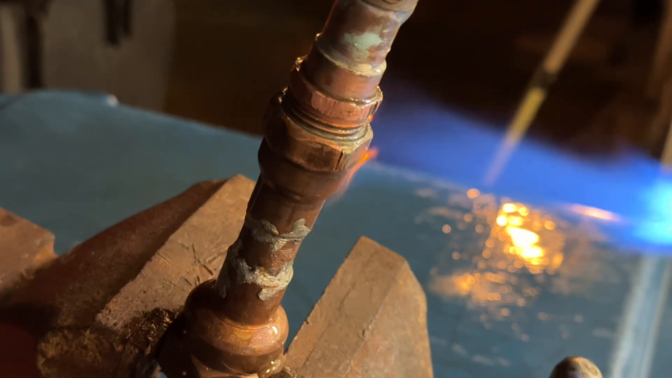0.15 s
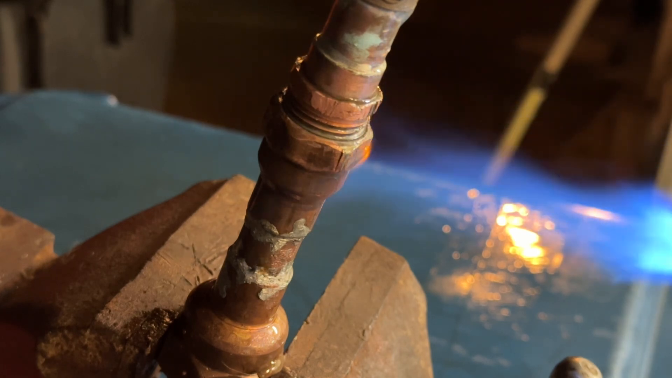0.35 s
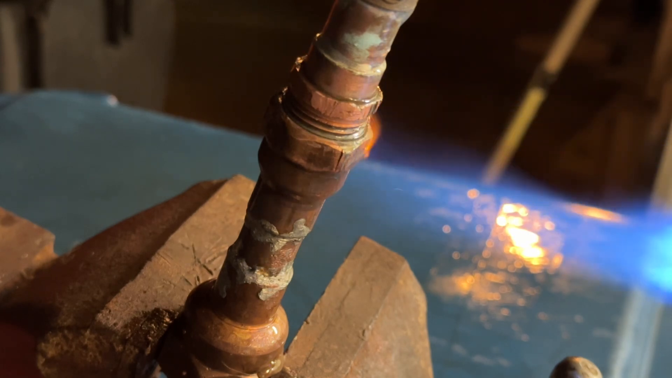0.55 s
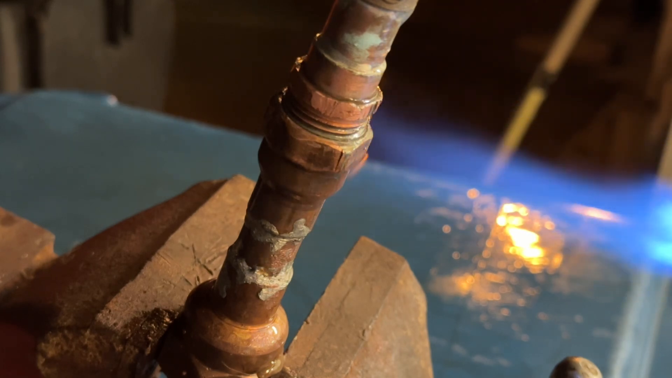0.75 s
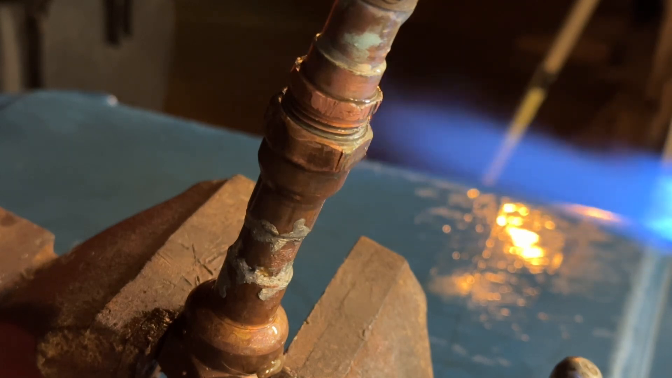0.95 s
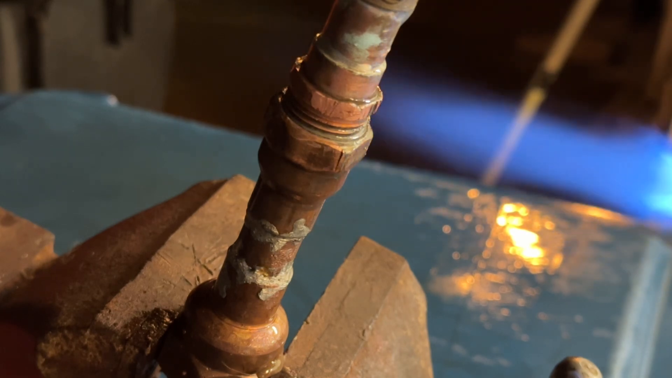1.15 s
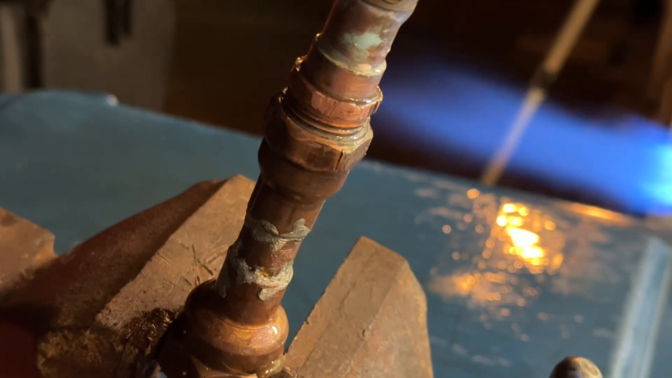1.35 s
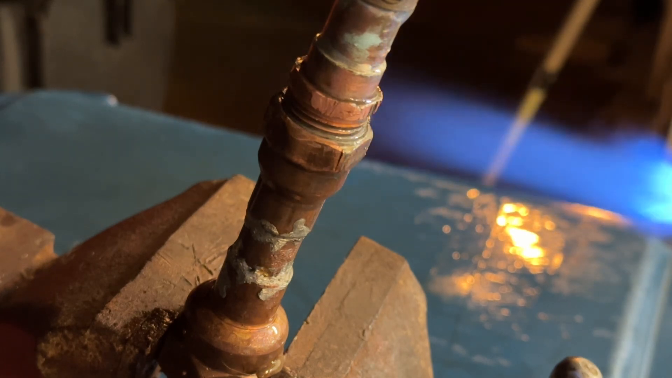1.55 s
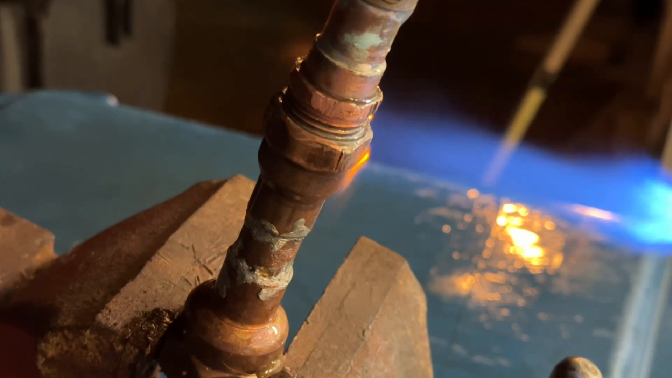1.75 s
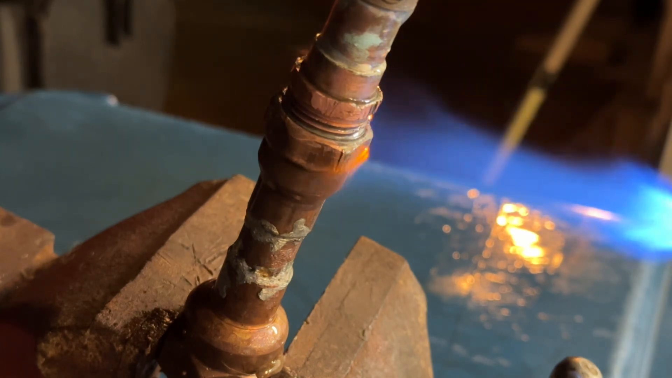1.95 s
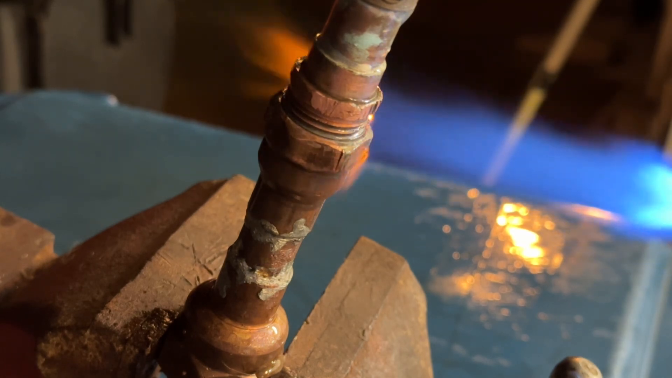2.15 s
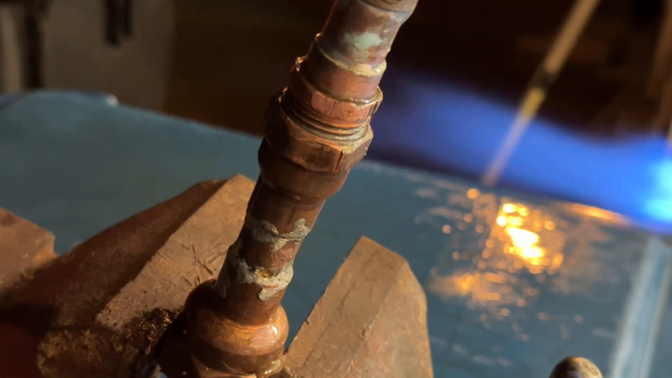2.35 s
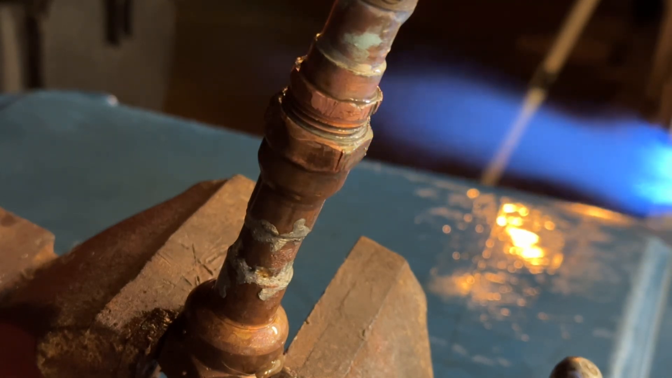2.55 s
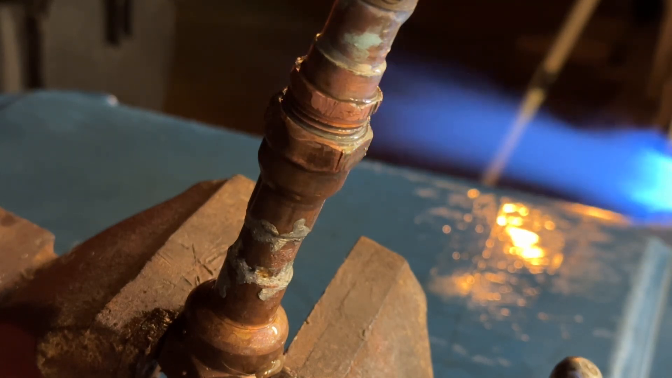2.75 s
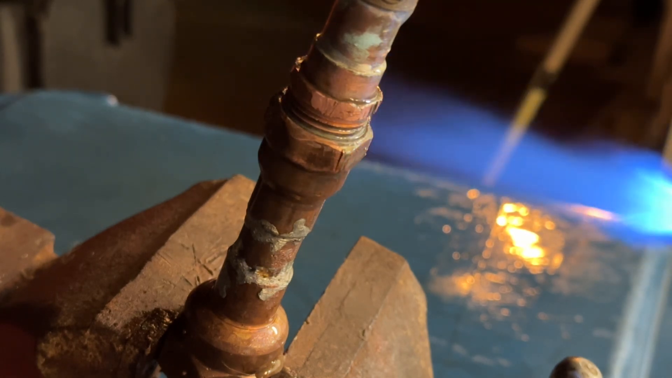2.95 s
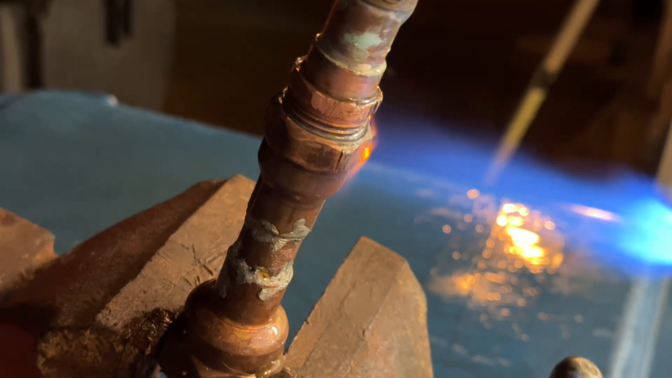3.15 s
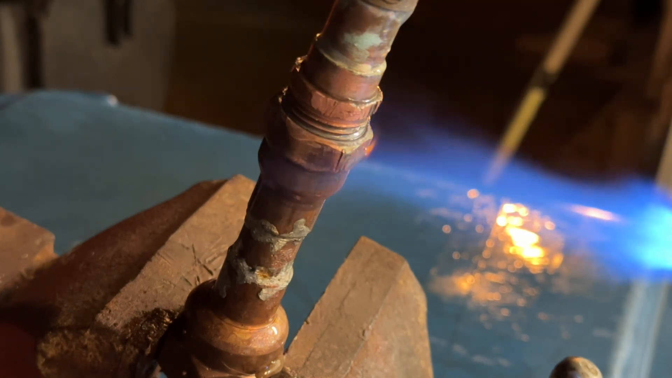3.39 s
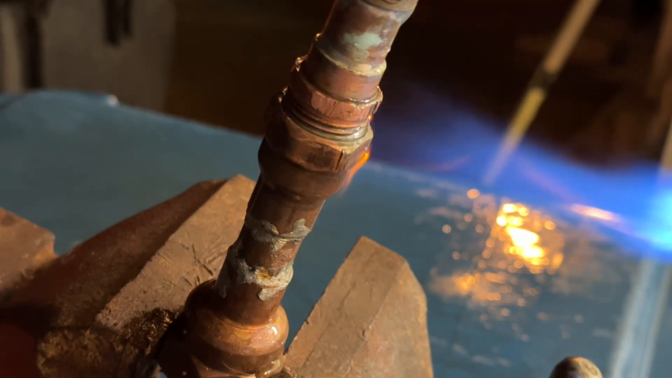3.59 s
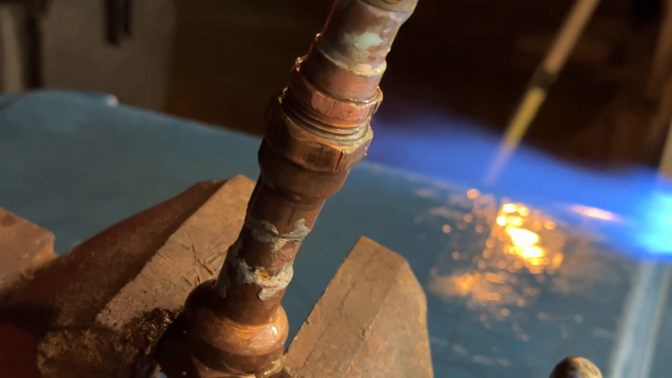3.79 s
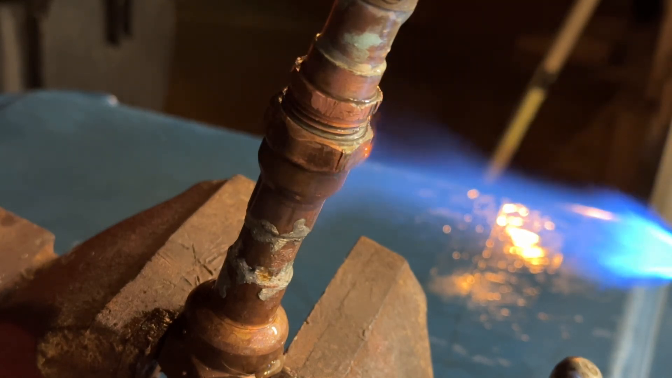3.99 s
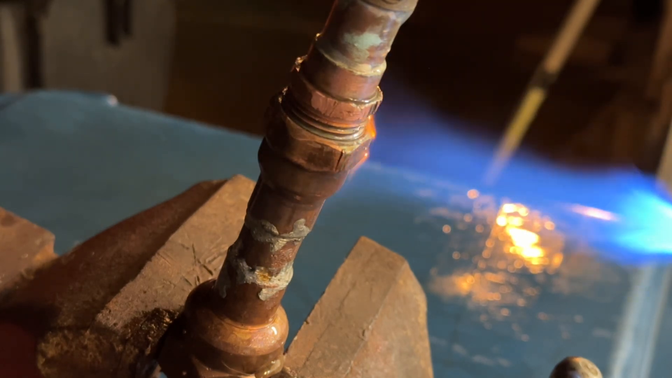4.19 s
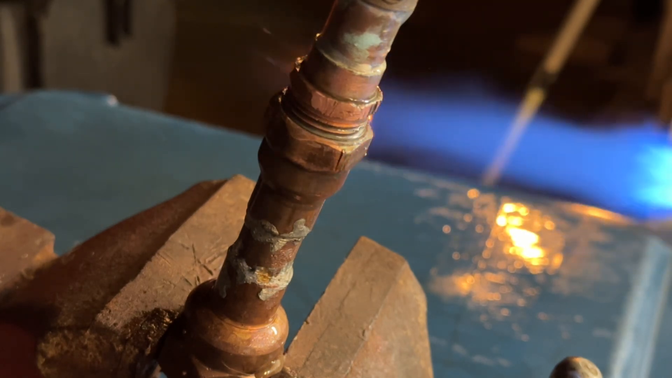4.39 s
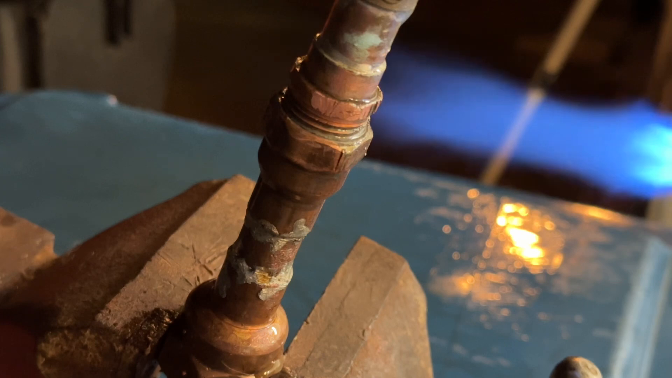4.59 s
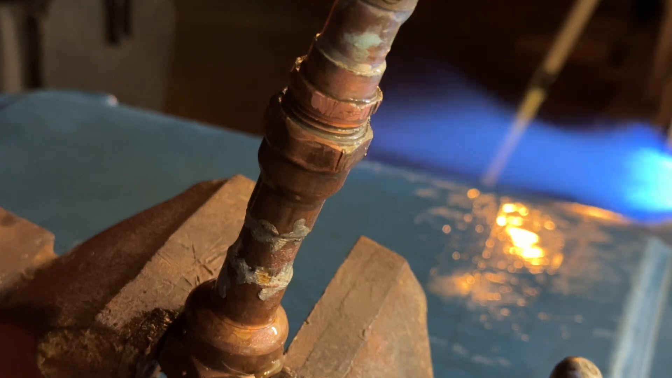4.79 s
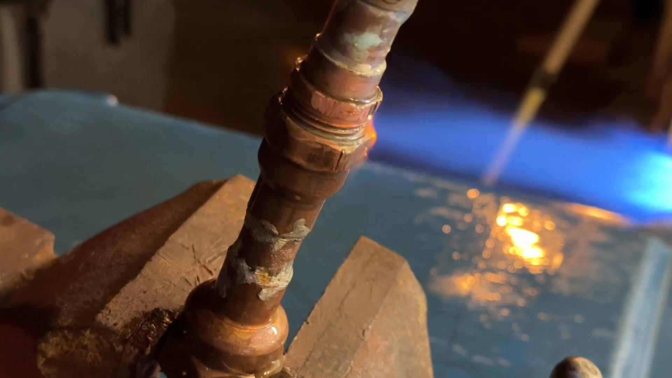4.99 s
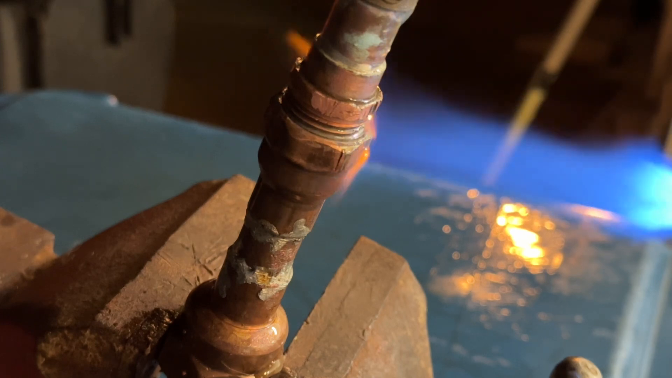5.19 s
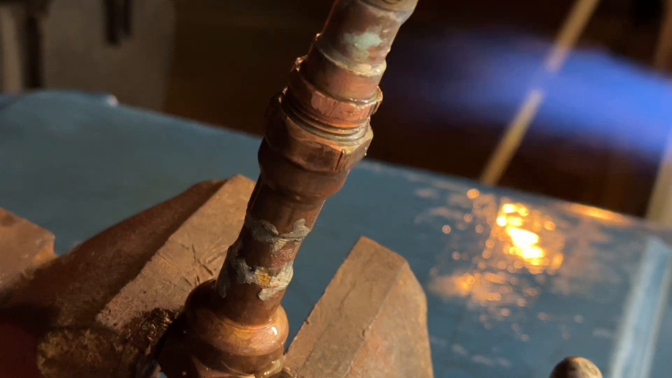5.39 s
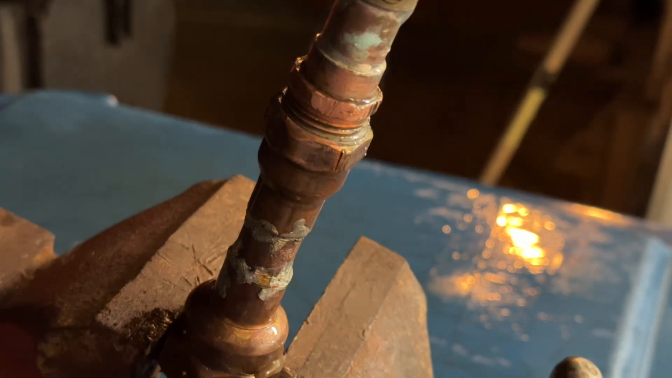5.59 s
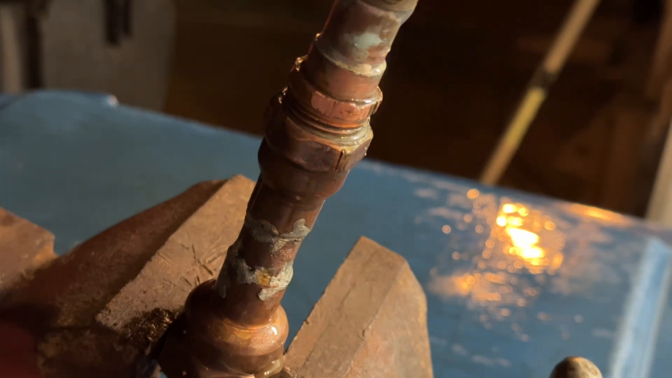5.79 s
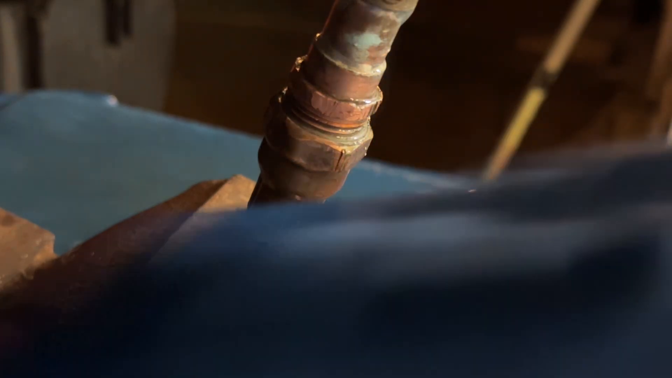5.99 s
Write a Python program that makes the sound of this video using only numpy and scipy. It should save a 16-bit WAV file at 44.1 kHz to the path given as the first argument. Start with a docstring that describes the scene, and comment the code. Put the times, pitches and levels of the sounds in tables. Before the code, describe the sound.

A hand-held gas torch roars and hisses steadily up close, then the valve clicks shut and the flame pops out, leaving quiet room rumble.

```python
"""A broad, wavering roar is heard first: a hand-held gas torch close to a two-port microphone in a small workshop.
The turbulent flame rumbles and the gas jet hisses through the burner tube, both as noise in third-octave bands.
Then the valve clicks shut (noise bursts), the flame shrinks and goes out in low puffs (gliding sines) with a short
whistle (a roughened sine), and the last gas seeps out (narrow noise bands) over the rumble and hiss of the room."""
import sys
import numpy as np
from scipy import signal
from scipy.fft import rfft, irfft, next_fast_len
from scipy.io import wavfile
from scipy.ndimage import uniform_filter1d

SR = 44100
rng = np.random.default_rng(int(sys.argv[2]) if len(sys.argv) > 2 else 0)


def wrap_up_sound(samples):
    """Save the sound to the file named by the first command line argument, as 16-bit audio."""
    columns = np.atleast_2d(samples).T
    # keep every value between -1 and 1, then stretch to whole-number steps
    tamed = np.clip(columns, -1, 1)
    steps = np.round(tamed * 32767).astype(np.int16)
    wavfile.write(sys.argv[1], SR, steps)


N = 266364
T = np.arange(N) / SR
SIZE = next_fast_len(N)
HZ = np.maximum(np.arange(SIZE // 2 + 1) * SR / SIZE, 1)
TOP_HZ = 15780  # upper band limit of the recorder and the ticks


def undb(db):
    """Decibel law: a level becomes an amplitude ratio."""
    return 10 ** (np.asarray(db) / 20)


def level(x, db):
    """Root-mean-square level: the signal is scaled to db relative to 1."""
    return x * undb(db) / np.sqrt(np.mean(x ** 2))


def to_spectrum(x):
    """Fourier analysis over the padded length."""
    return rfft(x, SIZE)


def to_wave(spectrum):
    """Fourier synthesis, cut to the length of the scene."""
    return irfft(spectrum, SIZE)[..., :N]


def across(table):
    """Log-frequency interpolation: columns of a table read at every frequency."""
    hz, *columns = np.transpose(table)
    return [np.interp(np.log(HZ), np.log(hz), column) for column in columns]


def bell(hz, width):
    """Gaussian band weighting, down to one half at half the width from its centre."""
    return np.exp(-np.log(2) * (2 * (HZ - hz) / width) ** 2)


def swell(full_s, rise_s, fade_s):
    """Gaussian envelope in time with its own rise and fade."""
    spread_s = np.where(T < full_s, rise_s, fade_s)
    return np.exp(-.5 * ((T - full_s) / spread_s) ** 2)


def walk(rate):
    """Low-frequency random modulation: levels held 1 / rate s and slewed twice, with unit spread."""
    k = int(SR / rate)
    steps = np.repeat(rng.standard_normal(N // k + 1), k)
    smooth = uniform_filter1d(uniform_filter1d(steps, k), k)[:N]
    return smooth / smooth.std()


# How left and right differ: f/Hz, left lags/rad, unrelated share (0-1), left minus right/dB
PORT_DIFFERENCES = [(100, 0, .0005, -0.9), (180, 0, 0, 0.4), (300, -0.045, 0, 1.2), (590, 0.39, 0.02, 0),
                    (770, -0.0094, 0.02, -1.5), (1140, 0.12, 0.03, -1.5), (1260, 0, 0, -1), (1500, 0, 0, 0),
                    (2650, 0, 0, 0), (2960, 0.0074, 0, -0.5), (3480, -0.0038, 0.02, 0.5),
                    (4370, 0.3, 0, -0.5), (5100, 0, 0, -1.5), (6200, 0, 0, 0.5), (6350, 0, 0, 0),
                    (6830, 0, 0, 0), (6960, -0.87, 0.13, -3), (7480, -1.87, 0, 1.5), (7800, -np.pi, 0, 0),
                    (8550, -np.pi, 0, 0), (9050, -1.99, 0, 0), (10570, 0.22, 0.28, 0), (11050, 0, .002, 0),
                    (13050, 0, .003, 0), (13700, .1, .08, 0), (13850, .9, .4, 0), (15700, 2, .45, 0)]


def ports(x, unrelated=0):
    """Phase and level differences between left and right by frequency, plus an unrelated noise share."""
    rad, share, pan_db = across(PORT_DIFFERENCES)
    share = np.clip(share, 0, 1)
    sides = np.array([[.5], [-.5]])
    common = to_spectrum(x) * undb(sides * pan_db) * np.exp(-1j * sides * rad)
    separate = to_spectrum(unrelated + np.zeros((2, N)))
    return np.sqrt(1 - share) * common + np.sqrt(share) * separate


# Movement of the torch over the bench: t/s, lift (-1 to 1), turn (-1 to 1)
HAND_MOVEMENT = [(0, 0.39, 0.1), (.6, -0.72, 0.67), (1.35, 0.82, -0.1), (2., -.4, 0.32), (2.6, 0.43, -0.21),
                 (3.35, -0.58, 0.27), (4., 0.019, 0.47), (4.6, .2, -0.94), (5.15, -1, -1)]
# Hiss bands that change with it: f/Hz, width/Hz, gain change per lift, gain change per turn
MOVED_BANDS = [(4230, 450, 0.34, -0.35), (5070, 440, -0.39, 0.15), (5800, 400, 0, .3),
               (6220, 350, -0.1, -0.74), (7100, 270, -0.14, -0.29), (9670, 510, 0.11, -.45),
               (10400, 450, -0.15, .1), (10950, 400, 0.069, .3), (11600, 450, 0, -.45),
               (12050, 350, .25, 0), (12450, 300, -.25, -.1), (13100, 600, .2, .4), (14200, 500, 0, .25)]


def moved(x):
    """Interference with bench echoes: lifting and turning the torch strengthens some hiss bands, weakens others."""
    s, *hand = np.transpose(HAND_MOVEMENT)
    hz, width, *changes = np.transpose(MOVED_BANDS)
    bands = np.array([bell(*b) for b in zip(hz, width)])
    spectrum = to_spectrum(x)
    return x + sum(np.interp(T, s, h) * to_wave(spectrum * (c @ bands)) for h, c in zip(hand, changes))


ROAR_TOP_HZ = 900
TREBLE_FALL_PER_OCTAVE = 0.034  # extra share of the flow's fall for each octave above the roar
BASS_FALL_PER_OCTAVE = 0.058  # share of that fall spared for each octave below the roar
JET_FALL, JET_HZ = .5, 7800  # further share for the thin hiss of the jet, mostly above this pitch


def fall_share(centre):
    """Frequency-dependent decay: how strongly a band follows the flow, more in the treble than in the bass."""
    octaves = np.log2(centre / ROAR_TOP_HZ)
    share = 1 + TREBLE_FALL_PER_OCTAVE * max(octaves, 0)
    share += JET_FALL / (1 + (JET_HZ / centre) ** 10)
    return share - BASS_FALL_PER_OCTAVE * max(-octaves, 0)


# Broad colour of the torch: f/Hz, relative spectral level/dB
TORCH_COLOUR = [(25, -62), (40, -32), (60, -13.5), (120, -5), (210, 0), (500, -4), (850, -5), (1200, -8.5),
                (1800, -14.5), (3750, -18), (4200, -25), (7500, -23), (8600, -21.5), (10750, -25),
                (11300, -32), (16000, -35)]
# Burner-tube resonances, and dips where the bench echo cancels: f/Hz, width/Hz, level/dB
TUBE_BANDS = [(480, 27, -3.5), (1523, 196, -7.5), (2270, 210, 2), (2820, 110, -2), (4780, 220, -6),
              (5120, 230, 3.5), (5866, 380, 6), (6850, 270, -5.5), (7390, 630, 4), (7910, 490, -14),
              (9350, 1100, 2.5), (12200, 350, 2.5), (13050, 350, 3), (13600, 400, -2), (14250, 400, 4)]
# Gas flow, wavering and then shut off by the valve: t/s, level/dB of the roar
GAS_FLOW = [(.2, 0.8), (.75, 0.5), (1.25, -0.4), (1.75, 0.5), (2.25, -0.1), (2.8, 0.1), (3.25, .5),
            (4.2, 0.45), (4.8, 0), (5.42, 0.5), (5.46, -1), (5.48, -2), (5.52, -5.5), (5.54, -10.5),
            (5.548, -18), (5.563, -22), (5.57, -26), (5.6, -36), (5.66, -47), (5.75, -72)]
GUST_DB, GUST_HZ, GUST_OCTAVES = 0.67, 232, 1.15  # lumpy gusts shared by the low bands
SPUTTER_DB, RAGGED_DB = 1.5, 2  # while the flame starves: stutter of all bands, extra flicker of each


def torch():
    """Band-filtered turbulence: neighbours waver together, each flickers and drifts; treble dies first."""
    flow_db = np.interp(T, *np.transpose(GAS_FLOW))
    colour_db = across(TORCH_COLOUR)[0] + sum(db * bell(hz, width) for hz, width, db in TUBE_BANDS)
    # uneven eddies: the size of the noise itself varies at two rates
    unevenness_db = 0.5 * walk(300) + 0.15 * walk(70)
    eddies = rng.standard_normal((3, N)) * undb(unevenness_db)
    both = ports(eddies[0], eddies[1:]) * undb(colour_db)
    gust = walk(24.07)
    starving = np.clip((-1 - flow_db) / 7, 0, 1)
    sputter = SPUTTER_DB * starving * walk(70)
    waver, out = walk(12), 0
    for step in range(29):
        centre = 31 * 2 ** (step / 3)
        # overlapping triangles a third of an octave apart
        band = np.clip(1 - 3 * np.abs(np.log2(HZ / centre)), 0, 1)
        waver = 0.88 * waver + 0.6 * walk(12)
        gust_share = np.exp(-(np.log2(centre / GUST_HZ) / GUST_OCTAVES) ** 2)
        db = fall_share(centre) * flow_db + sputter
        db = db + GUST_DB * gust * gust_share + RAGGED_DB * starving * walk(45)
        db = db + 0.37 * waver + 0.6 * walk(30.03) + 0.22 * walk(1.66)
        out = out + undb(db) * to_wave(both * band)
    return level(moved(out), -22.0)


WIDER_FROM_S, WIDENING_TAKES_S = 5.44, 0.036


def widening():
    """Linear crossfade: 0 before 5.44 s, then up to 1 within 36 ms."""
    return np.clip((T - WIDER_FROM_S) / WIDENING_TAKES_S, 0, 1)


# Colour of the room: f/Hz, relative spectral level/dB
ROOM_COLOUR = [(30, -6), (50, -3), (88, -5), (200, -9), (400, -21), (600, -23), (1000, -29), (1700, -31.5),
               (3000, -36), (7000, -38), (10500, -42), (12000, -49), (16000, -53.5)]
# Room sound of opposite sign in left and right: f/Hz, level/dB against air noise of the same colour
ROOM_DIFFERENCE = [(60, -14), (150, -19), (270, -15), (420, -4), (800, -2), (1200, -4), (1650, -5),
                   (2100, -8), (2600, -24), (4000, -40)]
ROOM_DB = -51.5


def room():
    """Partly coherent background noise: low rumble and faint hiss, with an antiphase part from 5.44 s on."""
    colour = undb(across(ROOM_COLOUR)[0]) * np.minimum(HZ / 40, 1) ** 3
    noise = to_wave(to_spectrum(rng.standard_normal((4, N))) * colour)
    air = level(noise * undb(3.3 * walk(12)), ROOM_DB)
    apart = to_spectrum(air[3] * widening()) * undb(across(ROOM_DIFFERENCE)[0])
    return to_wave(ports(air[0], 3.0 * air[1:3]) + apart * np.array([[1], [-1]]))


# Wider low sound: f/Hz, left lags/rad, left minus right/dB
LOW_WIDTH = [(45, .1, 0), (150, .25, 0), (270, .4, 0), (420, .55, 0), (600, .4, -1.5), (800, .7, -1.5),
             (1350, .95, 0), (1650, .4, -1), (2000, .03, -.7), (2400, -.2, 0), (2800, -.25, 0),
             (3500, -.05, 0), (4000, 0, 0)]


def widened(x):
    """Stereo width: from 5.44 s on, the low sound is heard wider, differing in phase and level left to right."""
    rad, pan_db = across(LOW_WIDTH)
    late = x.mean(axis=0) * widening()
    # tanh of half the log ratio gives the side part that yields this left / right ratio
    side_ratio = np.tanh(np.log(undb(pan_db / 2)) - .5j * rad)
    side = to_wave(to_spectrum(late) * side_ratio)
    return x + np.array([side, -side])


# Valve and hand ticks: t/s, peak level/dB, centre f/Hz, width/octaves, t60/s of the added decay
VALVE_TICKS = [(5.476, -26, 8500, 1.7, 0.018), (5.5605, -41, 2600, 2.2, .012),
               (5.562, -46, 7000, 1.2, .014), (5.571, -49, 3800, 1.2, .014), (5.698, -41, 2800, 1.3, .02),
               (5.7012, -42, 6500, 1.8, .012), (5.7017, -36.5, 2100, 1.5, .01), (5.705, -55, 2700, .5, .08),
               (5.706, -52, 6000, .9, .09), (5.72, -52, 4000, .8, .01), (5.721, -55, 6900, .5, .06),
               (5.791, -55, 6900, .4, .02), (5.82, -60, 5900, .15, .04), (5.852, -57, 6800, .5, .014),
               (5.859, -49, 6000, .7, .014), (5.872, -59, 6300, .6, .014), (5.98, -56, 1200, 1.2, .02),
               (6.017, -58, 2500, .25, .03)]


def ticks():
    """Impulsive excitation: short band-passed noise bursts with exponential decay."""
    out, t = np.zeros(N), np.arange(3000) / SR
    noises = rng.standard_normal((len(VALVE_TICKS), len(t)))
    for (s, db, hz, octaves, t60), noise in zip(VALVE_TICKS, noises):
        half_width = 2 ** (octaves / 2)
        edges = [hz / half_width, min(hz * half_width, TOP_HZ)]
        sos = signal.butter(2, edges, "band", fs=SR, output="sos")
        burst = signal.sosfilt(sos, noise) * np.exp(-np.log(1000) * t / t60)
        i = int(s * SR)
        out[i:i + len(t)] += (undb(db) * burst / np.abs(burst).max())[:N - i]
    return out


# Puffs of the flame going out: t/s, level/dB before the envelope, start f/Hz, rise/s, t60/s
FLAME_PUFFS = [(5.6996, -22.5, 696, 0.00085, 0.018), (5.7014, -25, 330, .001, .02),
               (5.704, -18, 140, .005, 0.08), (5.739, -36, 800, .001, .016),
               (5.7413, -11, 235, 0.011, 0.031), (5.7495, -30, 520, .0007, .012),
               (5.7515, -41, 950, .0007, .014), (5.7523, -24.5, 165, .001, .04),
               (5.7605, -31, 75, .002, .07)]
PUFF_HALVES_S = .02  # time in which the pitch of a puff halves


def puffs():
    """Transient air displacement: decaying sines of falling pitch push the air of the tube."""
    out = np.zeros(N)
    for s, db, hz, rise, t60 in FLAME_PUFFS:
        t = np.clip(T - s, 0, 2 * t60)
        # integral of the exponentially falling pitch
        turns = hz * PUFF_HALVES_S / np.log(2) * (1 - 2 ** (-t / PUFF_HALVES_S))
        envelope = (1 - np.exp(-t / rise)) * np.exp(-np.log(1000) * t / t60)
        out -= undb(db) * envelope * np.sin(2 * np.pi * turns)
    return out


# Flame retreating into the tube: t/s, f/Hz, rms level/dB before the roughness
WHISTLE_GLIDE = [(5.697, 1197, -62), (5.7, 1230, -38), (5.707, 1300, -47), (5.717, 1390, -43),
                 (5.732, 1345, -39.5), (5.742, 1350, -43), (5.748, 1300, -54), (5.752, 1170, -51),
                 (5.759, 1140, -54), (5.769, 1080, -66)]
WHISTLE_ROUGH, WHISTLE_BREAKS_S = .7, 5.746  # roughness added once the whistle breaks up


def whistle():
    """Tube resonance with amplitude modulation: a near sine of gliding pitch, rougher once it breaks up."""
    s, hz, db = np.transpose(WHISTLE_GLIDE)
    gain = np.sqrt(2) * undb(np.interp(T, s, db, left=-200, right=-200))
    roughness = np.clip(.15 + WHISTLE_ROUGH * (T > WHISTLE_BREAKS_S), 0, 1)
    gain = gain * (1 + roughness * walk(500))
    return gain * np.sin(2 * np.pi * np.cumsum(np.interp(T, s, hz)) / SR)


# Bands of the seeping gas: f/Hz, width/Hz, relative level/dB before the envelope,
# share of the pitch rise (0-1), fullest at t/s, swell/s, fade/s
SEEPING_BANDS = [(1400, 300, -2, .5, 5.985, .04, .05), (2080, 380, 3.5, .5, 5.91, .055, .05),
                 (2500, 350, -1, .3, 6.01, .03, .05), (3350, 450, -3, .1, 5.9, .1, 0.076),
                 (4460, 220, -1, .08, 5.97, .13, 0.069), (7000, 600, -5, .2, 5.92, .07, .11),
                 (8800, 500, -9, .2, 5.92, .07, .11)]
SEEP_DB = -66.5  # gain of the whole seep, around which it flickers
SEEP_FULL_S, SEEP_SWELL_S, SEEP_FADE_S = 5.92, 0.07, 0.13  # envelope of the broad hiss
SEEP_RISE_PER_S = .5  # relative pitch rise, before each band's share
SEEP_STEADY = 1  # steady tone in each band, against its noise
SEEP_BROKEN_DB, SEEP_WAVER = 1.2, 0.0072  # each band flickers in level and wanders in pitch (relative)


def seep():
    """Resonance-filtered jet noise: unlit gas hisses in narrow bands that rise a little as the tube empties."""
    ratio = np.maximum(1 + SEEP_RISE_PER_S * (T - SEEP_FULL_S), .5)
    hiss = to_wave(to_spectrum(rng.standard_normal(N)) * bell(6500, 11000))
    gas = level(hiss, 0.5) * swell(SEEP_FULL_S, SEEP_SWELL_S, SEEP_FADE_S)
    for hz, width, db, share, *times in SEEPING_BANDS:
        # a tone times slow noise is a narrow band of noise around the tone
        slow = to_wave(to_spectrum(rng.standard_normal((2, N))) * bell(0, width))
        pitch = hz * ratio ** share * (1 + SEEP_WAVER * walk(30))
        phase = 2 * np.pi * np.cumsum(pitch) / SR
        tone = (slow[0] + SEEP_STEADY * slow.std()) * np.cos(phase) + slow[1] * np.sin(phase)
        gas = gas + level(tone, db) * swell(*times) * undb(SEEP_BROKEN_DB * walk(50))
    return gas * undb(SEEP_DB + 1.5 * walk(35))


def scene():
    """Superposition: torch and shut-off sounds share the widening; room and seep are added without it."""
    shut_off = to_wave(ports(ticks() + puffs() + whistle()))
    return widened(torch() + shut_off) + room() + to_wave(ports(seep()))


def record(dry):
    """Band limitation: the recorder cuts the top with a steep elliptic low-pass."""
    return signal.sosfilt(signal.ellip(16, .3, 90, TOP_HZ, fs=SR, output="sos"), dry)


dry = scene()
out = record(dry)
wrap_up_sound(out)
```